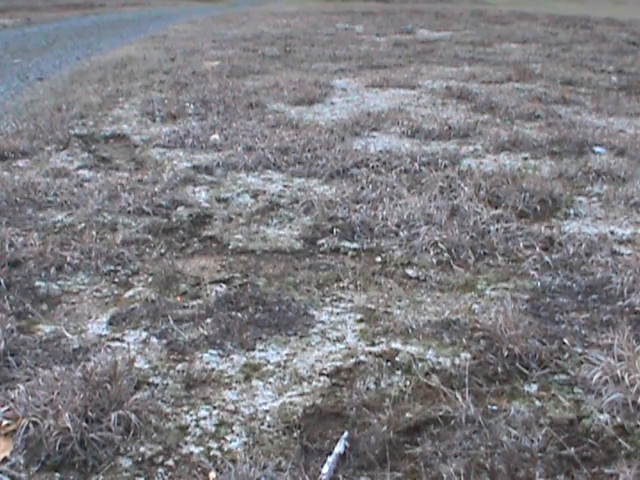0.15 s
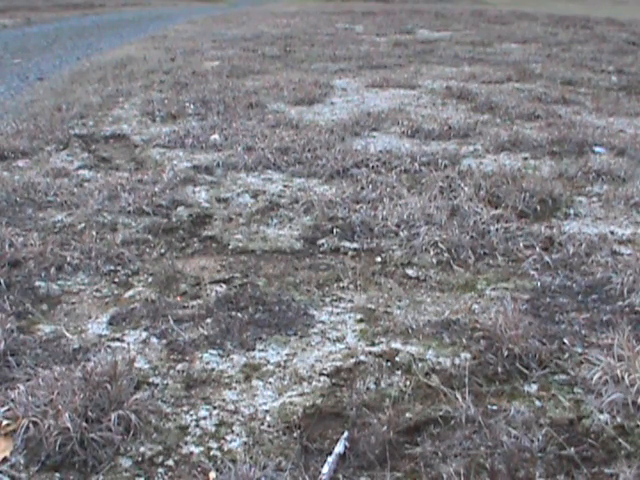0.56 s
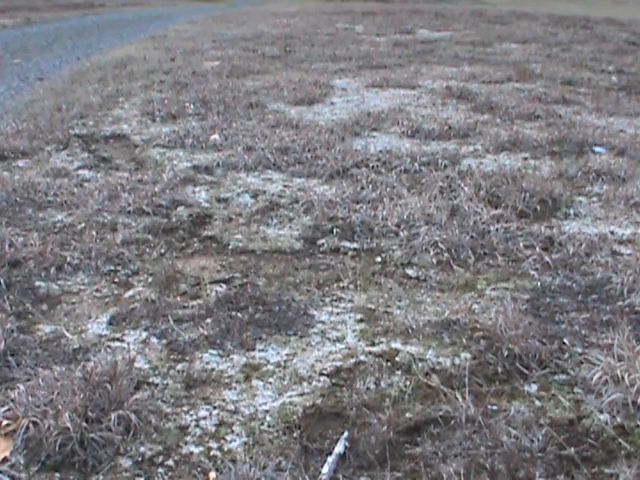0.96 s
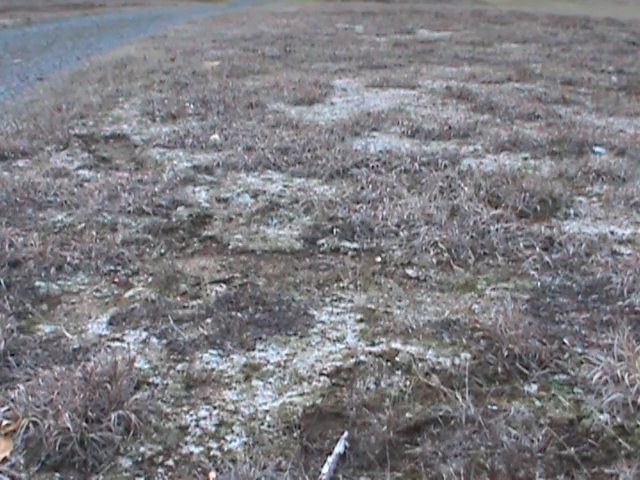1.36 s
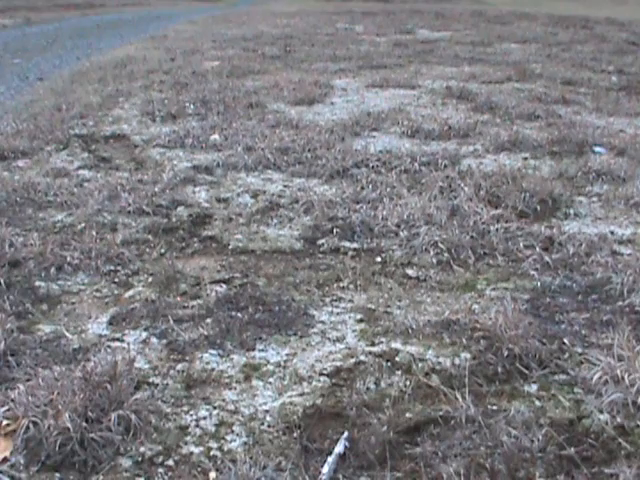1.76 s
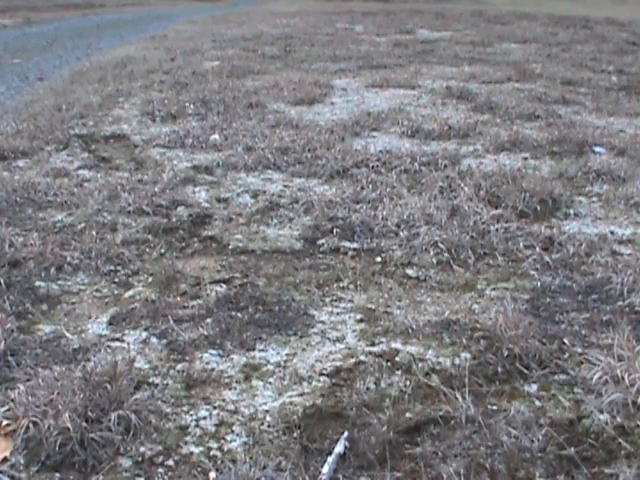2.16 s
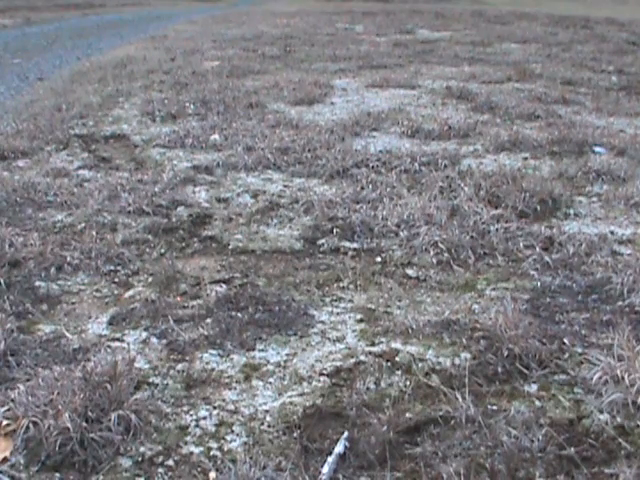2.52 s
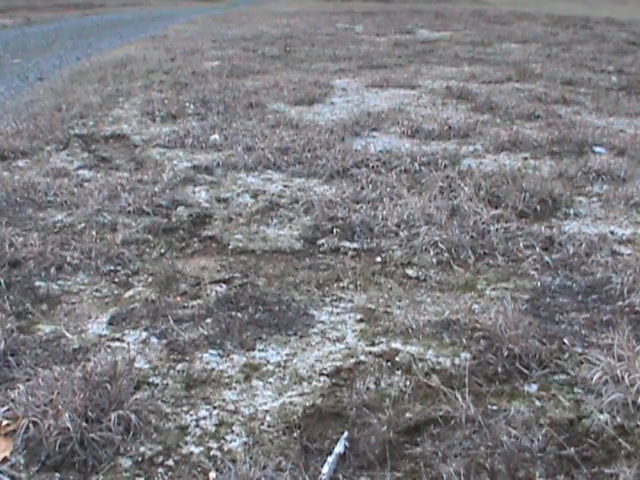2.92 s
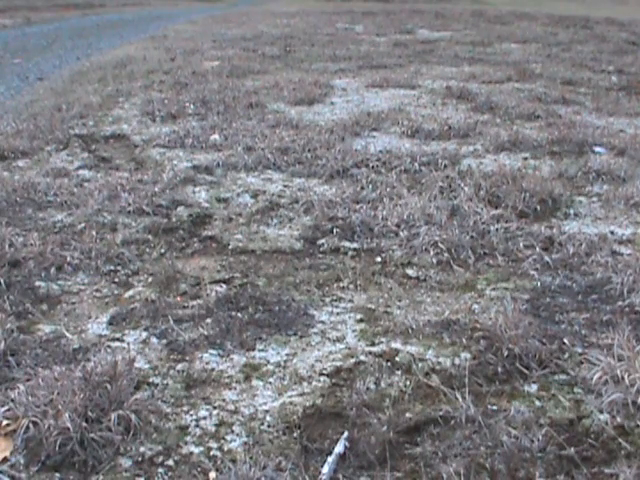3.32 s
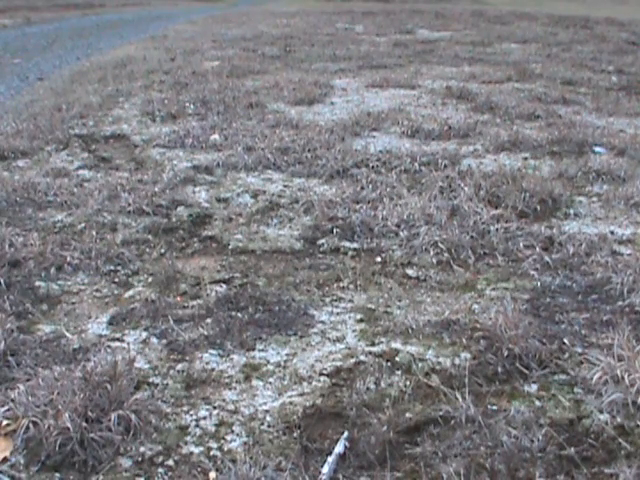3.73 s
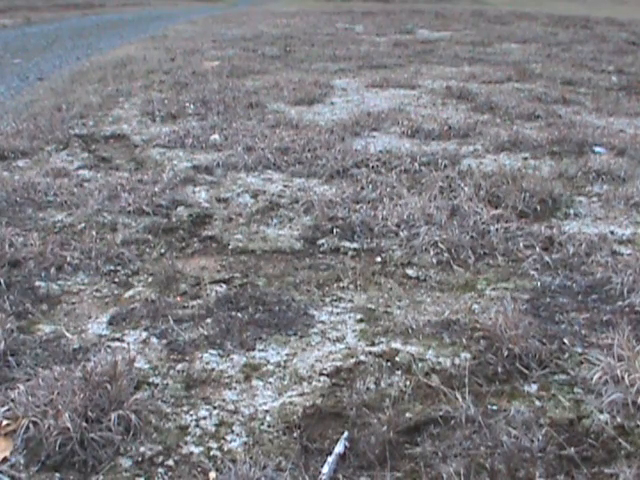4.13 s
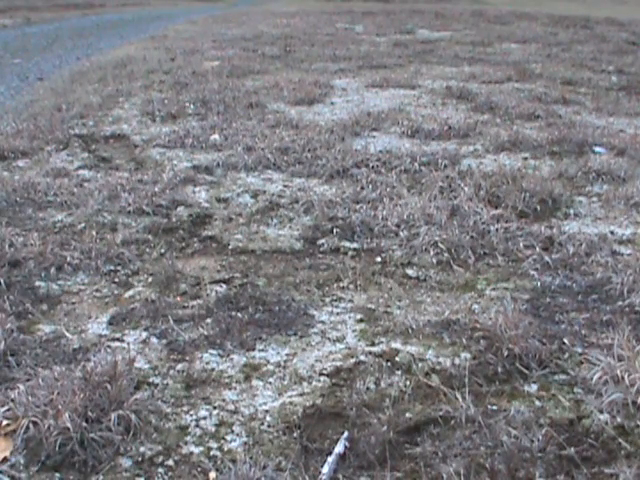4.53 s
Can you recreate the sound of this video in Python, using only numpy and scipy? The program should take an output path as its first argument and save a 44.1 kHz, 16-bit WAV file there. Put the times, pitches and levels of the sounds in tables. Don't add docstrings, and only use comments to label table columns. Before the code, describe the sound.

Over a faint road drone and bird whistles, a muffled gunshot cracks, hits stony ground, and a whirring ricochet hisses away into dull echoes.

```python
import sys
import numpy as np
from scipy import signal
from scipy.fft import rfft, irfft
from scipy.io import wavfile
from scipy.ndimage import uniform_filter1d, map_coordinates

SR = 44100
rng = np.random.default_rng(int(sys.argv[2]) if len(sys.argv) > 2 else 0)


def inscribe(sig):
    pcm = np.round(np.clip(np.atleast_2d(sig).T, -1, 1) * 32767)
    wavfile.write(sys.argv[1], SR, pcm.astype(np.int16))


def linear_from_db(decibels):
    return 10 ** (np.asarray(decibels, float) / 20)


N = 206381
TIME = np.arange(N) / SR
SHOT_S, STRIKE_S = 2.80155, 2.82


def unit(x):
    return x / np.sqrt(np.mean(x ** 2) + 1e-20)


def along(points, hz):
    f, v = np.transpose(points)
    return np.interp(np.log(hz + 1), np.log(f + 1), v)


def curves(rows, t=TIME):
    s, *cols = np.transpose(rows)
    return [np.interp(t, s, c) for c in cols]


def lasting(rows, fade):
    return np.clip(np.minimum(TIME - rows[0][0], rows[-1][0] - TIME) / fade + 1, 0, 1)


def wobble(rate):
    knots = rng.standard_normal(int(N * rate / SR) + 4)
    return map_coordinates(knots, [TIME * rate])


def swell(t, start, rise, t60):
    t = np.clip(t - start, 0, None)
    return (1 - np.exp(-t / rise)) * linear_from_db(-60 * t / t60)


def placed(x, left_db):
    return x * linear_from_db(np.array([[.5], [-.5]]) * left_db)


def air(hz, s, db_per_s):
    return linear_from_db(-db_per_s * np.clip(s - SHOT_S, 0, None) * (hz / 10000) ** 1.23)


def rush(colour, side_db, patchy_db):
    hz, t, z = signal.stft(rng.standard_normal((2, N)), SR, nperseg=1024, noverlap=896)
    patches = uniform_filter1d(rng.standard_normal(z.shape[1:]), size=12, axis=0)
    patches = uniform_filter1d(patches, size=16, axis=1)
    gain = colour(hz[:, None], t) * np.ones_like(t)
    gain = gain / np.sqrt(np.mean(gain ** 2, axis=0) + 1e-20) * linear_from_db(patchy_db * unit(patches))
    turn = np.arctan(linear_from_db(along(side_db, hz)))[:, None]
    mid, side = z[0] * np.cos(turn), z[1] * np.sin(turn)
    pair = gain * np.array([mid + side, mid - side])
    return unit(signal.istft(pair, SR, nperseg=1024, noverlap=896)[1][:, :N])


def burst(rows, rise_share):
    out, size, lead_s = np.zeros((2, N)), SR // 4, .05
    t, f = np.arange(size) / SR - lead_s, np.fft.rfftfreq(size, 1 / SR)
    for s, db, t60, hz, width in rows:
        band = np.exp(-((f - hz) / width) ** 4)
        mid, side = irfft(rfft(rng.standard_normal((2, size))) * band, size)
        rise = np.exp(-(t / (rise_share * t60)) ** 2)
        shape = np.where(t < 0, rise, linear_from_db(-60 * np.abs(t) / t60))
        start = round((s - lead_s) * SR)
        out[:, start:][:, :size] += linear_from_db(db) * shape * unit(mid + .3 * side * [[1], [-1]])
    return placed(out, left_db=2.0)


def spin(turns, level):
    phase = np.cumsum(turns * (1 + 0.00757 * wobble(60))) / SR
    tone = np.sin(2 * np.pi * phase) + linear_from_db(-11) * np.sin(4 * np.pi * phase)
    return phase, linear_from_db(3 + 1.7 * wobble(25)) * level * tone


# pitch_hz [Hz], level_db [dB]
HISS = [(2650, 4.5), (4500, -0.5), (12800, -3), (15000, -1.5), (15200, 2), (16200, -15), (16500, -34)]
# pitch_hz [Hz], side_minus_mid_db [dB]
ROAD_SIDE = [(60, -27), (110, -29), (200, -20.5), (380, -5), (700, -8), (1290, -7.5), (2380, -5),
             (4400, -5.5), (8120, -5.5), (15000, -10)]


def camera_noise():
    hiss = linear_from_db(-57.5) * rush(lambda hz, s: linear_from_db(along(HISS, hz)), ROAD_SIDE, patchy_db=-1.25)
    beat = np.sin(np.pi * 12.9 * (TIME - .53))
    return hiss + linear_from_db(-65.5) * beat * np.sin(2 * np.pi * 15735 * TIME)


# pitch_hz [Hz], level_db [dB per Hz]
DRONE = [(28, -37), (48, -5.5), (80, -7.5), (103, 0), (156, -4.5), (168, -10), (178, -11), (227, -5),
         (269, -16), (298, -18), (327, -23), (450, -22), (580, -49), (990, -120)]
# pitch_hz [Hz], level_db [dB per Hz]
TYRES = [(190, -13.5), (330, -0.5), (360, -8), (578, -9), (862, -0.5), (1090, 2), (1490, -3), (3310, -16.5),
         (6500, -25.5), (8450, -57), (14300, -120)]
# peak_s [s], added_to_drone_db [dB], half_length_s [s]
LORRIES = [
    (.75, 0.5, 0.18),
    (1.623, 2, 0.13),
    (3.43, 4.5, 0.046),
    (4.19, 5, 0.24),
    (4.47, 5, 0.078),
    (4.68, 4.5, 0.077),
]


def road():
    nearer_db = 1.18 * TIME
    lorries_db = sum(db * np.exp(-((TIME - s) / half) ** 2) for s, db, half in LORRIES)
    drone_db = -53.5 + 0.45 * nearer_db + lorries_db + 0.47 * wobble(5.56)
    roar_db = -53 + nearer_db + 0.73 * wobble(4.3)
    drone = linear_from_db(drone_db) * rush(lambda hz, s: linear_from_db(along(DRONE, hz)), ROAD_SIDE, patchy_db=-0.47)
    roar = linear_from_db(roar_db) * rush(lambda hz, s: linear_from_db(along(TYRES, hz)), ROAD_SIDE, patchy_db=0.5)
    return placed(drone, left_db=.5) + placed(roar, left_db=-.8)


# pitch_hz [Hz], drift_hz [Hz], level_db [dB]
ENGINES = [
    (116.7, 13, -56.5),
    (152.1, 8.95, -58.5),
]


def engines():
    out = np.zeros(N)
    for hz, drift, db in ENGINES:
        phase = np.cumsum(hz + drift * wobble(12)) / SR
        out += linear_from_db(db + 3 + 1.3 * wobble(6.1)) * np.sin(2 * np.pi * phase)
    return out


def whistle(rows, drop_hz, drop_db):
    end, hz, db = rows[-1]
    plunge = [(end + .003, hz - .25 * drop_hz, db + drop_db), (end + .009, hz - drop_hz, db + drop_db - 5)]
    rows = list(rows) + plunge
    hz, db = curves(rows)
    level = linear_from_db(db + 5.0 + 1.6 * wobble(70)) * lasting(rows, 0.0024)
    tone = level * np.sin(2 * np.pi * np.cumsum(hz + 30 * wobble(150)) / SR)
    return tone + linear_from_db(-15) * np.roll(tone, 700)


# start_s [s], length_s [s], first_hz [Hz], glide_hz [Hz], level_db [dB]
FAR_BIRD = [
    (1.475, .035, 8100, 500, -71),
    (1.475, .035, 7600, 300, -71),
    (1.84, .04, 8800, 150, -71),
    (1.9, .045, 9130, 50, -73),
    (2.03, .03, 8750, -200, -66),
    (2.08, .04, 8600, -50, -66),
    (2.26, .06, 8650, 50, -75),
    (4.655, .06, 8800, -400, -68),
]


def far_bird():
    out = np.zeros(N)
    for s, size, hz, glide, db in FAR_BIRD:
        note = [(s, hz, db - 6), (s + .5 * size, hz + .5 * glide, db), (s + size, hz + glide, db - 4)]
        out += whistle(note, drop_hz=50, drop_db=-8)
    return placed(out, left_db=.3)


# start_s [s], length_s [s], first_hz [Hz], last_db [dB], sag_db [dB]
NEAR_BIRD = [
    (-.1, .14, 8400, -59.5, 6),
    (1.88, .168, 8500, -62, 12),
    (2.125, .12, 8310, -62, 9),
    (3.925, .162, 8550, -60, 6),
    (4.153, .11, 8400, -63, 11),
]


def near_bird():
    rest_hz, last_hz, slide_s = 8000, 8080, .045
    out = np.zeros(N)
    for s, size, hz, db, sag in NEAR_BIRD:
        slide = [(s, hz, db - 9), (s + slide_s / 3, hz - 200, db - 4), (s + slide_s, rest_hz, db - sag)]
        climb = [(s + .74 * size, rest_hz + 30, db - sag), (s + size - .006, last_hz, db),
                 (s + size, last_hz - 60, db - 1)]
        out += whistle(slide + climb, drop_hz=2270, drop_db=2)
    return placed(out, left_db=3)


# start_s [s], level_db [dB], t60_s [s]
FARTHEST = [
    (3.1, -47.5, 4.3),
    (3.92, -41.5, .7),
    (4.2, -42, 2.1),
]
# pitch_hz [Hz], side_minus_mid_db [dB]
FAR_SIDE = [(60, -23), (110, -23), (200, -22), (380, -14), (700, -14), (1290, -18), (2380, -13.5),
            (4400, -12.5), (8120, -4), (15000, -3)]


def farthest_roll():
    dull = lambda hz, s: np.exp(-(np.log(hz / 1000 + 1e-6) / 0.36) ** 2)
    far = rush(dull, FAR_SIDE, patchy_db=-0.5)
    return np.sqrt(sum((linear_from_db(db) * swell(TIME, s, 0.1, t60)) ** 2 for s, db, t60 in FARTHEST)) * far


# pitch_hz [Hz], level_db [dB]
REPORT = [(150, -41), (400, -17.5), (800, -15.5), (1500, -8), (2200, 0), (3200, -2), (4500, 0), (7000, -4),
          (12000, -0.5), (16500, -28)]
# start_s [s], level_db [dB], t60_s [s], left_minus_right_db [dB], width_db [dB]
BANKS = [
    (2.82, -16, .22, 4, 1),
    (2.835, -21.5, 0.34, 1, -18),
    (3.02, -46.5, 4.9, 5, 10.5),
    (3.19, -45.5, 4, 0.5, 4),
    (3.35, -42, 3.74, -1.5, -4),
    (3.79, -47.5, 2.7, 4, -4),
]


def banks():
    back = rush(lambda hz, s: linear_from_db(along(REPORT, hz)) * air(hz, s, db_per_s=46.0), FAR_SIDE, patchy_db=-0.5)
    power = np.array([(linear_from_db(db) * swell(TIME, s, 0.011 * t60 + .0005, t60)) ** 2 for s, db, t60, *_ in BANKS])
    total = power.sum(axis=0) + 1e-20
    left_db, width_db = np.transpose(BANKS)[3:] @ power / total
    near = np.sqrt(total) * linear_from_db(0.25 * wobble(40)) * back
    mid = near.mean(axis=0)
    return placed(mid + linear_from_db(width_db) * (near - mid), left_db)


# peak_s [s], level_db [dB], t60_s [s], centre_hz [Hz], width_hz [Hz]
ANSWERS = [
    (3.012, -37, .04, 2500, 1600),
    (3.072, -39.5, .13, 4500, 1900),
    (3.205, -44, .15, 3500, 1800),
    (3.601, -38.5, .025, 5200, 2200),
    (3.619, -40, .06, 5300, 2500),
]


def sharp_echoes():
    return burst(ANSWERS, rise_share=.065)


# peak_s [s], level_db [dB], t60_s [s], centre_hz [Hz], width_hz [Hz]
TRIGGER = [
    (.37, -62, .5, 5300, 2300),
    (2.683, -53, .02, 7500, 4000),
    (2.7325, -48, .014, 8400, 500),
    (2.7325, -50, .012, 11500, 1800),
    (2.7325, -55, .012, 5000, 600),
]


def trigger():
    return burst(TRIGGER, rise_share=.065)


# pitch_hz [Hz], level_db [dB], t60_s [s]
MUZZLE = [(1800, -9, .0011), (3300, 0, .0011), (6600, -8, .001), (11500, -19, .0012)]


def crack():
    t = np.clip(TIME - SHOT_S, 0, None)
    build = (t / .0004) ** 2
    ring = sum(linear_from_db(db - 60 * t / t60) * np.cos(2 * np.pi * hz * (t - .00041)) for hz, db, t60 in MUZZLE)
    return placed(-linear_from_db(13.8) * build * ring, left_db=1.2)


# peak_s [s], level_db [dB], t60_s [s], centre_hz [Hz], width_hz [Hz]
GAS = [
    (2.8026, -25.5, .1, 8000, 6500),
]


def muzzle_gas():
    return burst(GAS, rise_share=.005)


# peak_s [s], level_db [dB], t60_s [s], centre_hz [Hz], width_hz [Hz]
NEARING = [
    (2.8138, -21, .004, 12000, 2500),
    (2.8138, -21, .004, 5500, 2500),
]


def approach():
    return burst(NEARING, rise_share=1.3)


# peak_s [s], level_db [dB], t60_s [s], centre_hz [Hz], width_hz [Hz]
STRIKE = [
    (2.8183, -11, .011, 11500, 3500),
    (2.8182, -17, .008, 4000, 5000),
    (2.8202, -12.5, .012, 10500, 3500),
]


def strike():
    return burst(STRIKE, rise_share=.065)


# pitch_hz [Hz], width_hz [Hz], level_db [dB]
SOIL = [(330, 110, -1), (510, 80, 1), (740, 80, 0), (1000, 200, -4), (1250, 150, -5)]
# pitch_hz [Hz], side_minus_mid_db [dB]
SHOT_SIDE = [(60, -19), (110, -21), (200, -20), (380, -15), (700, -37), (1290, -18), (2380, -14),
             (4400, -23), (8120, -19), (15000, -9)]


def soil_thud():
    def soil(hz, s):
        modes = sum(linear_from_db(2 * db) / (1 + (2 * (hz - c) / w) ** 2) for c, w, db in SOIL)
        return np.sqrt(modes) * (hz > 250) / (1 + (hz / 1500) ** 2)

    rise_s, hold_s, t60 = 0.0043, 0.075, 0.35
    t = TIME - (STRIKE_S - rise_s)
    shape = np.clip(t / rise_s, 0, 1) * linear_from_db(-60 * np.clip(t - hold_s, 0, None) / t60)
    return placed(linear_from_db(-37.5) * shape * rush(soil, SHOT_SIDE, patchy_db=2.0), left_db=1.5)


# time_s [s], pitch_hz [Hz], level_db [dB]
CHIP = [
    (2.82, 385, -52),
    (2.85, 348, -43),
    (2.885, 335, -53),
    (2.95, 413, -51),
    (3.05, 490, -62),
]


def splinter():
    hz, db = curves(CHIP)
    return spin(hz, linear_from_db(db) * lasting(CHIP, .01))[1]


# time_s [s], turns_per_s [1/s], ground_echo_band_spacing_hz [Hz]
FLIGHT = [(2.825, 214, 5600), (2.89, 244, 5480), (3.0, 304, 4400), (3.1, 359, 3750), (3.2, 405, 3500),
          (3.336, 453, 3230), (3.47, 488, 2980), (3.7, 526, 2800)]
# pitch_hz [Hz], level_db [dB per Hz]
WAKE = [(1500, -35), (3000, -15), (4500, -10.5), (6500, -9), (8200, -3), (9500, -1), (10800, 2), (12500, 0),
        (14300, -3), (16000, -8)]


def bullet():
    flown = np.clip(TIME - STRIKE_S, 0, None)

    speed_m_s, nearest_m, ground_loss = 200, 12, 1.15
    away = (nearest_m / (nearest_m + speed_m_s * flown)) ** ground_loss
    away = away * linear_from_db(3 * np.minimum(flown, 1) * wobble(30.22))
    whirr_rise = 1 - np.exp(-(flown / .035) ** 2)
    phase, whirr = spin(curves(FLIGHT)[0], linear_from_db(-37.5) * away * whirr_rise * lasting(FLIGHT, .05))

    def colour(hz, s):
        echo = 1.5 * swell(s, STRIKE_S, .22, np.log(1000) * .4)
        bounce = np.abs(1 + echo * np.exp(2j * np.pi * hz / curves(FLIGHT, s)[1]))
        return linear_from_db(along(WAKE, hz)) * bounce * air(hz, s, db_per_s=23)

    wake = rush(colour, SHOT_SIDE, patchy_db=1.0)
    sizes = linear_from_db(2.2 * rng.standard_normal(int(phase[-1]) + 1))[phase.astype(int)]
    throb = sizes * (.6 + .6 * np.cos(2 * np.pi * (phase - .3))) ** 1.6 * 1.76
    depth = np.clip(.72 * swell(TIME, STRIKE_S - .02, .07, np.log(1000) * .5), 0, 1)
    level_db = -20 - 46 * (1 - np.exp(-(flown / .415) ** 1.3))
    hiss = linear_from_db(level_db) * lasting(FLIGHT, .002) * (1 - depth + depth * np.abs(throb)) * wake
    return placed(hiss, left_db=1.1) + whirr


def passing(pair):
    lead_us, after_us, coming_s, going_s = 85, 9, .011, .004
    t = TIME - 2.818
    gone = np.clip(t, 0, None)
    coming = (lead_us + after_us) * np.exp(-(t / coming_s) ** 2)
    going = lead_us * np.exp(-gone / going_s) + after_us * np.exp(-gone / .08)
    half = np.where(t < 0, coming, going) * SR / 2e6
    return np.array([map_coordinates(x, [np.arange(N) + way * half], order=5) for x, way in zip(pair, (1, -1))])


def scene():
    backdrop = road() + engines() + far_bird() + near_bird()
    returned = farthest_roll() + banks() + sharp_echoes()
    gun = trigger() + crack() + muzzle_gas()
    impact = approach() + strike() + soil_thud() + splinter()
    return backdrop + passing(returned + gun + impact + bullet())


def low_pass(x):
    return signal.sosfilt(signal.butter(12, 16830, fs=SR, output="sos"), x)


def record(dry):
    limit = 1 / (1 + (np.fft.rfftfreq(N, 1 / SR) / 15850) ** 600)
    mix = irfft(rfft(dry + camera_noise()) * limit, N)
    return low_pass(mix)


dry = scene()
out = record(dry)
inscribe(out)
```